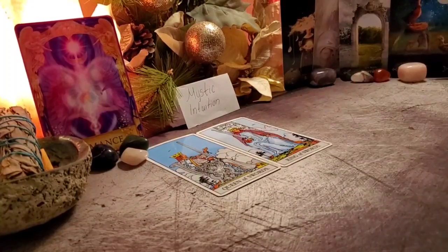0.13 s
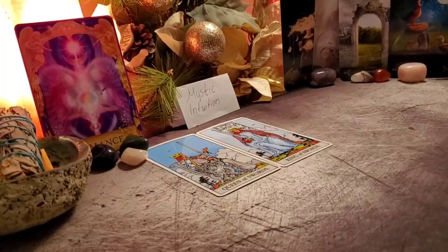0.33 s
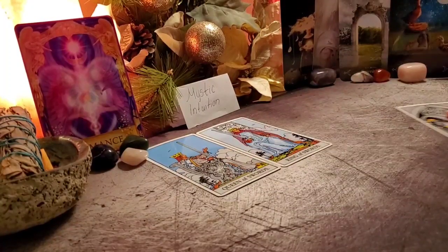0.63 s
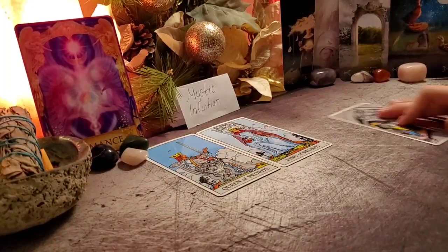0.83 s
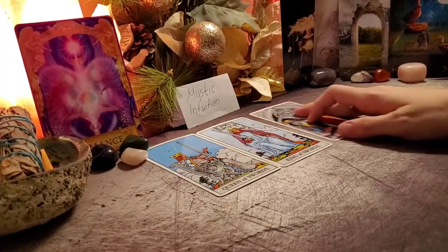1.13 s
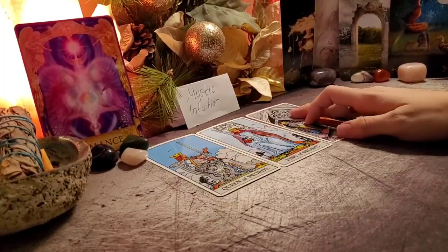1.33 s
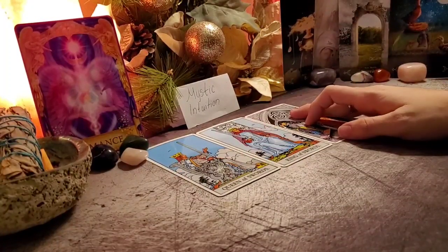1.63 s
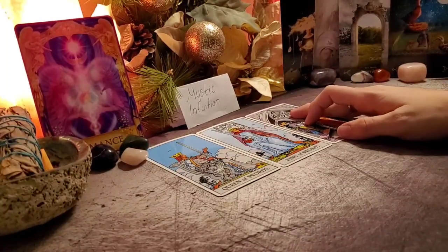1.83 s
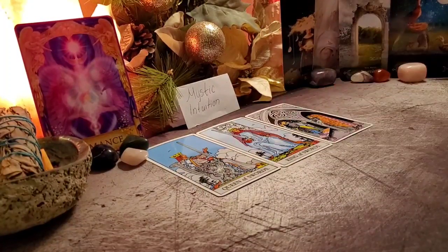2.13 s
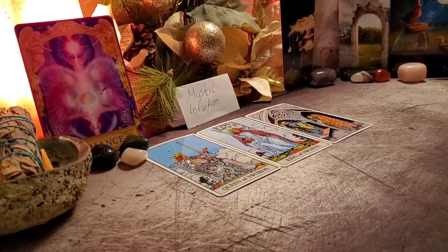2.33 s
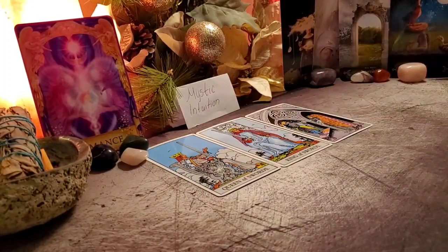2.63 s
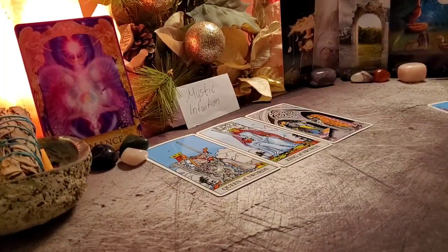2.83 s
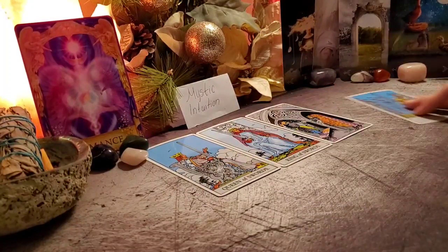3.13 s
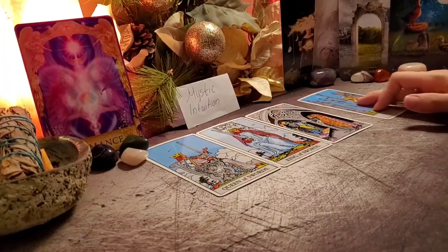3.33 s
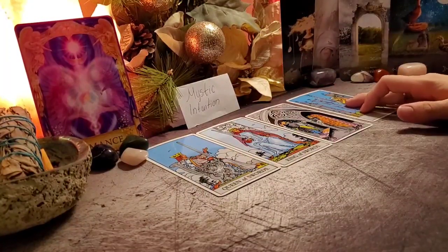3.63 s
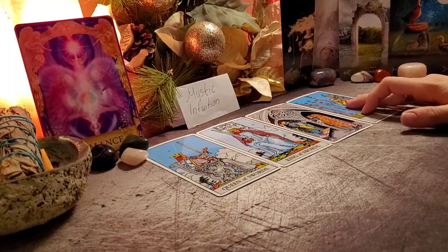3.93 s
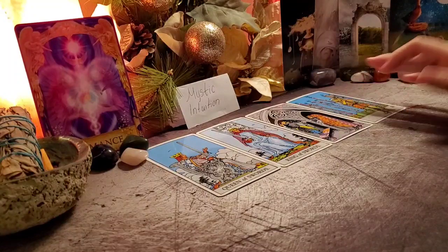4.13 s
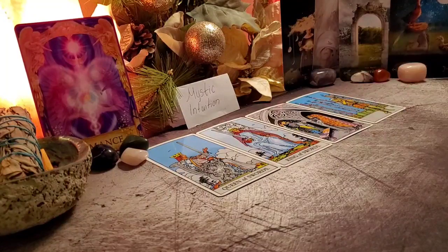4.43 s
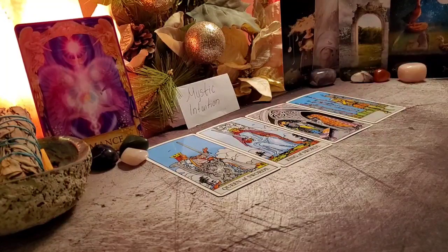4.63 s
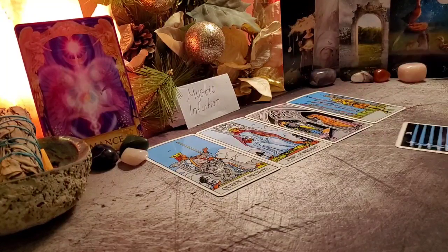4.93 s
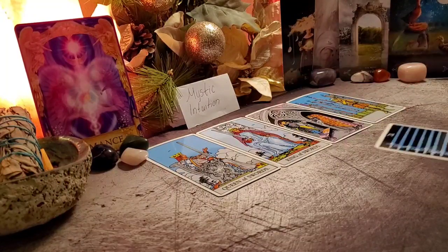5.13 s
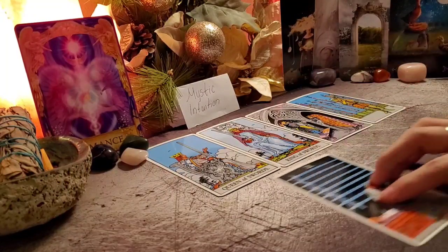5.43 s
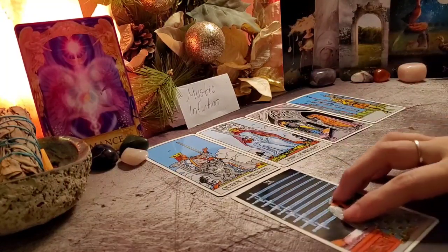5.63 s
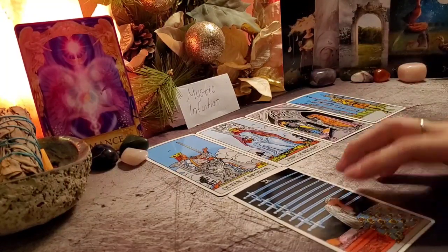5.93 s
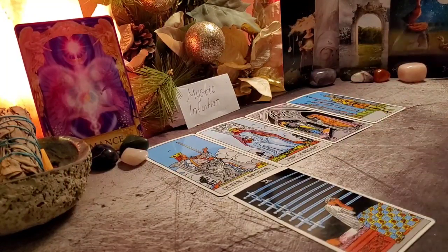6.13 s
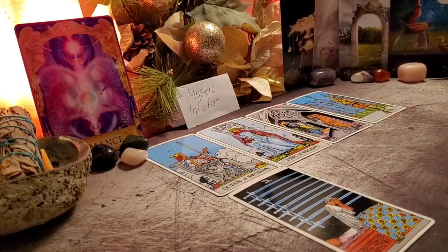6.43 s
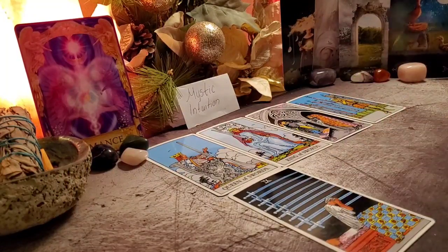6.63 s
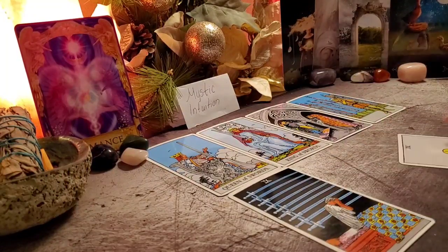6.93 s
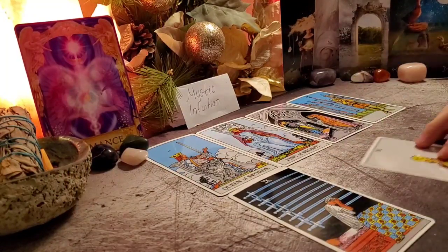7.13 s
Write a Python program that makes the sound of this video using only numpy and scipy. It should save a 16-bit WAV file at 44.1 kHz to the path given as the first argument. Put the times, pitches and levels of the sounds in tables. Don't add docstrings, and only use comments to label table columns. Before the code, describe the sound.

Close stereo pickup in a small room with a steady low motor hum and soft appliance wash. Four times, about two seconds apart, a stiff card drags off a deck at the right and snaps free in a quick, crisp flurry of clicks. A moment later it ticks and knocks onto the hard table in front, then slides with a faint grainy hiss. The hum fills the gaps.

```python
import sys
import numpy as np
from scipy import signal
from scipy.io import wavfile
from scipy.ndimage import uniform_filter1d

SR = 44100
rng = np.random.default_rng(int(sys.argv[2]) if len(sys.argv) > 2 else 0)


def dump_mix(stems):
    frames = np.atleast_2d(stems).T
    limited = np.clip(frames, -1, 1)
    pcm = np.round(limited * 32767).astype(np.int16)
    wavfile.write(sys.argv[1], SR, pcm)


def to_linear_factor(level_db):
    exponent = np.asarray(level_db, float) / 20
    return 10 ** exponent


N = 321489

STEADY, SUDDEN = 2.5, 1.2


def evened(x):
    return x / np.sqrt(np.mean(x ** 2) + 1e-20)


def peaked(x):
    return x / (abs(x).max() + 1e-20)


def read(points, hz):
    f, value = np.transpose(points)
    return np.interp(np.log(hz + 1), np.log(f + 1), value)


def ring(x, hz, t60):
    r = 10 ** (-3 / (t60 * SR))
    return signal.lfilter([1, 0, -1], [1, -2 * r * np.cos(2 * np.pi * hz / SR), r * r], x)


def twice(x, hz, t60):
    return peaked(ring(ring(x, hz, t60), hz, t60 / 2))


def port_noise(shape_db, same, lag_s, pan_db, size, patchy_db):
    hop = size // 4
    hz = np.fft.rfftfreq(size, 1 / SR)
    a, b, c, d, patches = rng.standard_normal((N // hop + 5, len(hz), 5)).T
    for axis in (0, 1):
        patches = uniform_filter1d(patches, size=10, axis=axis)
    alike = np.clip(same(hz), 0, 1)[:, None]
    right = a + 1j * b
    delay = np.exp(-2j * np.pi * hz * lag_s)[:, None]
    left = alike * right * delay + np.sqrt(1 - alike ** 2) * (c + 1j * d)
    pan = to_linear_factor(pan_db(hz) / 2)[:, None]
    spectra = np.array([left * pan, right / pan])
    spectra *= to_linear_factor(shape_db(hz)[:, None] + patchy_db * evened(patches))
    return evened(signal.istft(spectra, nperseg=size, noverlap=size - hop)[1][:, :N])


def strokes(rows, power, extra_db=0):
    t = np.arange(0, N / SR + .01, .001)
    peak, rise, fall, db = np.array(rows).T[:4, :, None]
    away = np.maximum((peak - t) / rise, (t - peak) / fall)
    each = to_linear_factor(db + extra_db - 30 * abs(away) ** power)
    return np.interp(np.arange(N) / SR, t, np.sqrt((each ** 2).sum(0)))


def background(wash_db=-7, second_db=-26):
    # t/s, level/dB
    hum_level = [(0.0, -43), (0.1, -42), (0.3, -43.5), (0.6, -45.5), (1.44, -45.5), (1.87, -42), (2.5, -43),
                 (2.7, -42.5), (4.16, -43), (4.3, -42.3), (4.63, -43.5), (7.07, -42.5), (7.29, -43)]
    # f/Hz, density/dB per Hz
    wash_shape = [(15, -68), (25, -38.5), (54, -27.5), (86, -27), (101, -12.5), (125, -14.5), (150, -16),
                  (202, -18.5), (237, -34.5), (264, -22.5), (543, -25), (604, -17.5), (769, -26),
                  (833, -26), (15000, -78.5)]
    # f/Hz, width/Hz, level/dB
    ducts = [(59.07, 12, 0.5), (208.7, 16, -4), (284, 13, -3.5), (360, 81, -10), (430, 90, -9.5),
             (593, 43, -8.5), (1200, 30, -20.5)]
    # f/Hz, likeness [0-1]
    likeness = [(60, 0.84), (290, .93), (700, 0.98), (1500, 0.67), (4000, 0.1), (15000, .1)]
    # f/Hz, left minus right/dB
    wash_pan = [(60, -0.5), (180, 2.5), (550, -2), (1650, 9), (4970, 4.5), (15000, -13.5)]
    t = np.arange(N) / SR

    def colour(hz):
        humps = sum(to_linear_factor(2 * db) / (1 + (2 * (hz - f) / w) ** 2) ** 2 for f, w, db in ducts)
        return 10 * np.log10(to_linear_factor(2 * read(wash_shape, hz) - 4.0) + humps * to_linear_factor(-14.0))

    wash = port_noise(colour, lambda hz: read(likeness, hz), -0.00034, lambda hz: read(wash_pan, hz),
                      size=4096, patchy_db=1.8)
    wash += to_linear_factor(-42.0) * evened(np.diff(rng.standard_normal((2, N + 1))))
    turn = 2 * np.pi * 119.8 * t
    hum = np.sqrt(2) * (np.sin(turn + [[.15], [0]]) + to_linear_factor(second_db) * np.sin(2 * turn))
    hum *= to_linear_factor([[1.2], [-1.3]])
    return to_linear_factor(np.interp(t, *np.transpose(hum_level))) * (hum + to_linear_factor(wash_db) * wash)


def room(x):
    # f/Hz, t60/s
    decay = [(150, 0.33), (500, 0.33), (1500, 0.3), (4000, 0.2), (8000, 0.21), (14000, 0.16)]
    taps = np.zeros((2, SR // 2))
    at = np.arange(120, SR // 2 - 20, 20) + rng.integers(0, 20, (2, (SR // 2 - 121) // 20))
    np.put_along_axis(taps, at, rng.choice([-1., 1.], at.shape), 1)
    taps[0] = 0.12 * np.roll(taps[1], 12) + 1.6 * taps[0]
    hz, t, spectra = signal.stft(taps, SR, nperseg=256)
    fading = spectra * to_linear_factor(-60 * t / read(decay, hz)[:, None])
    tail = signal.istft(fading, SR, nperseg=256)[1]
    return signal.fftconvolve(x.mean(0)[None], tail / np.linalg.norm(tail[0]), axes=1)[:, :N]


def slides():
    # peak t/s, rise/s, fall/s, hiss level/dB, scrape against hiss/dB
    table_slides = [(0.84, 0.19, 0.36, -69.5, -21), (1.06, 0.38, 0.28, -68, 0.5),
                    (1.49, 0.12, 0.059, -86, -1), (2.18, 0.32, 0.2, -77, 2), (2.39, 0.069, 0.14, -80.5, -7),
                    (3.02, 0.063, 0.4, -66.5, -9), (3.27, 0.22, 0.41, -64, 2), (3.84, 0.075, .17, -84, 4),
                    (4.27, 0.18, 0.2, -78, 5), (5.17, 0.3, .25, -73, 0), (5.5, 0.57, 0.38, -69, -4.5),
                    (6.23, 0.27, 0.13, -78, 1), (6.95, 0.095, 0.13, -77, 6.5), (7.13, .2, .07, -74, -3),
                    (7.3, 0.22, .1, -72.5, -4)]
    deck_pulls = [(0.054, 0.1, 0.053, -63, -4), (0.178, 0.13, 0.037, -65, -2), (0.29, 0.2, .02, -64, 1),
                  (0.31, 0.023, 0.16, -40, -0.5), (0.54, 0.01, 0.16, -70, 12.5),
                  (2.575, 0.1, 0.2, -57.5, -4), (2.632, 0.039, 0.15, -54.5, -2),
                  (2.868, 0.0073, 0.23, -76, 13.5), (4.69, 0.38, .05, -69, 3),
                  (4.718, 0.02, 0.035, -58.5, 3.5), (4.74, 0.013, 0.15, -44.5, -11),
                  (5.002, 0.0054, .15, -83.5, 17.5), (6.375, .006, .12, -73.5, 11),
                  (6.422, .015, 0.033, -67, 0), (6.605, 0.17, 0.13, -47, -5.5),
                  (6.85, .005, 0.15, -68.5, 17)]
    # f/Hz, density/dB per Hz
    hiss_shape = [(1760, -44), (3000, -1), (4840, -4.5), (6340, -1), (7810, -9.5), (8460, -6.5),
                  (13900, -5.5), (15000, -9.5)]
    # f/Hz, density/dB per Hz
    scrape_shape = [(500, -44.5), (1100, 1), (2000, 3), (3300, -14), (5000, -19.5), (6000, -62)]
    hiss = port_noise(lambda hz: read(hiss_shape, hz), lambda hz: 0.15 + 0 * hz, 0.00022,
                      np.zeros_like, size=256, patchy_db=1.5)
    scrape = port_noise(lambda hz: read(scrape_shape, hz), lambda hz: 0.4 + 0 * hz, 0.00027,
                        np.zeros_like, size=512, patchy_db=2.5)
    side = np.array([[.5], [-.5]])
    fine, coarse = to_linear_factor(-99 + side * 4.5), to_linear_factor(-72.5 + side * 4.5)
    for rows, power, pan_db in ((table_slides, STEADY, 1), (deck_pulls, SUDDEN, -4)):
        pan = to_linear_factor(side * pan_db)
        scrape_db = np.array(rows)[:, -1:]
        fine = np.hypot(fine, strokes(rows, power) * pan)
        coarse = np.hypot(coarse, strokes(rows, power, scrape_db) * pan)
    return to_linear_factor(6.0) * (fine * hiss + coarse * scrape)


def push():
    pushes = [
        (2.59, 0.14, .05, -62.5),
        (2.625, 0.032, .008, -47.5),
        (4.575, 0.05, 0.23, -61.5),
    ]
    rub = evened(ring(rng.standard_normal((2, N)), 3400, 0.0031))
    return rub * strokes(pushes, STEADY) * to_linear_factor([[-3.5], [3.5]])


def wipe():
    wipes = [
        (2.522, 0.025, 0.16, -53),
        (4.715, 0.04, 0.075, -54),
        (6.51, 0.047, .1, -48),
        (6.575, 0.084, .07, -41),
    ]
    treble = signal.butter(3, 7500, "high", fs=SR)
    fizz = evened(signal.lfilter(*treble, rng.standard_normal((2, N))))
    return fizz * strokes(wipes, STEADY) * to_linear_factor([[-3.2], [3.2]])


def slips(rows, edge_db, weight_db, octave_db=11.5):
    return [(s, db + edge_db + octave_db * np.log2(hz / 2700), hz, db, knock_db,
             -29.5 + weight_db + 0.6 * (knock_db + 20.5)) for s, db, hz, knock_db in rows]


def clicks(rows, knocks, lag_s, ports_db, low_hz, top_hz, drag_db, card_t60, shadow_db):
    knock_t60, thump_t60, rattle_t60, drag_t60 = .0065, .015, .005, 0.04
    out, t = np.zeros((2, N + 4000)), np.arange(3000) / SR
    chance = rng.standard_normal((len(rows), 3, len(t)))
    bright = signal.butter(2, [low_hz, min(top_hz, 20000)], "band", fs=SR)
    rattle, drag = to_linear_factor(-60 * t / rattle_t60), to_linear_factor(drag_db - 60 * t / drag_t60)
    for (s, tick_db, ring_hz, ring_db, knock_db, thump_db), (shared, *own) in zip(rows, chance):
        tune = 1 + 0.16 * np.tanh(shared[-2:])
        knock_hz = np.interp(s, *np.transpose(knocks))
        for port in (0, 1):
            blow = (shared + 0.82 * own[port]) * rattle - 2.7 * (t == 0)
            tick = peaked(signal.lfilter(*bright, blow + own[port] * (1.2 * rattle + 5.5 * drag)))
            blow = blow + shared[::-1] * drag
            card = twice(blow, ring_hz, card_t60)
            knock = twice(blow, knock_hz * tune[0], knock_t60)
            knock += 0.43 * twice(blow, knock_hz * 0.7, knock_t60)
            knock -= 0.2 * twice(blow, knock_hz * 1.8, knock_t60)
            shove = shared * rattle - 2.4 * (t == 0)
            thump = twice(shove, 240 * tune[1], thump_t60) + .07 * twice(shove, 60, 0.07)
            sound = to_linear_factor(tick_db + 3.0 - shadow_db * (6 - port)) * tick
            sound += to_linear_factor(ring_db + 0.67) * card
            sound += to_linear_factor(knock_db + 2.5) * peaked(knock)
            sound += to_linear_factor(thump_db + 1.5) * thump
            at = round((s + lag_s * (1 - port)) * SR)
            out[port, at:at + len(t)] += sound * to_linear_factor(ports_db[port])
    return out[:, :N]


def landings():
    # t/s, snap level/dB, card ring f/Hz, table knock level/dB
    touches = [(0.5365, -44, 3600, -41), (0.5403, -39, 4450, -33.5), (0.5554, -29, 3760, -31),
               (0.5641, -30.5, 3140, -59), (0.5735, -33, 3120, -67.5), (2.8636, -34, 3270, -34.5),
               (2.8713, -36, 3050, -51), (2.882, -37.5, 3000, -65), (2.9824, -57, 4400, -62),
               (2.9916, -50.5, 4623, -59), (4.215, -56, 4120, -59.5), (4.9848, -52.5, 3600, -51),
               (4.9999, -37.5, 4180, -38), (5.0089, -41.5, 3040, -50), (5.0185, -40.5, 3280, -63),
               (6.8472, -33, 4200, -17.5), (6.8574, -43, 2350, -32), (6.8958, -45, 2370, -38),
               (6.9087, -44, 3820, -47.5), (6.962, -57, 4500, -61.5), (7.0817, -49.5, 2200, -63)]
    # t/s, f/Hz
    table_knock = [
        (.54, 727),
        (2.87, 1250),
        (5.01, 845),
        (6.848, 682),
    ]
    return clicks(slips(touches, -5.5, -1.54, octave_db=17), table_knock, .0001, (-.1, -1.5), low_hz=2200,
                  top_hz=6500, drag_db=-13.5, card_t60=0.0041, shadow_db=1.2)


def deals():
    # t/s, snap level/dB, card ring f/Hz, deck knock level/dB
    fumbles = [(0.0303, -38.5, 2290, -62.5), (0.0345, -36, 2900, -57), (0.0385, -46, 3070, -60),
               (0.0423, -40, 2900, -55), (0.0551, -57, 2640, -68.5), (0.132, -38.5, 3540, -47.5),
               (0.1692, -52, 4680, -60.5), (0.1818, -43.5, 3210, -67), (0.2257, -39.5, 3200, -66.5),
               (0.234, -48.5, 2250, -65), (2.5173, -55.5, 6020, -59.5), (6.3721, -47.5, 2480, -43.5),
               (6.389, -65, 5000, -66), (6.4229, -42, 2900, -66), (6.4986, -63, 6500, -64),
               (6.5964, -30, 3050, -42)]
    deal_1 = [(0.3061, -27.5, 1820, -29), (0.3125, -23, 2510, -31), (0.3148, -16.5, 2200, -28.5),
              (0.322, -21.5, 1980, -30), (0.3275, -8, 2590, -9.5), (0.3308, -12, 2440, -10),
              (0.3365, -14.5, 2900, -17), (0.3391, -21.5, 2070, -17), (0.3494, -19, 2800, -16.5),
              (0.355, -21.5, 2400, -24.5), (0.3593, -15.5, 2665, -20), (0.3677, -15, 2400, -17),
              (0.3765, -28.5, 3220, -22.5), (0.385, -35.5, 3000, -24)]
    deal_2 = [
        (2.6338, -5, 3630, -16),
        (2.6374, -22.5, 2080, -20),
        (2.6403, -18, 2100, -17),
        (2.645, -15, 4100, -18),
        (2.649, -22.5, 2200, -26),
        (2.654, -37.5, 4270, -21.5),
        (2.6598, -33.5, 3170, -23),
        (2.673, -35, 3090, -32),
    ]
    deal_3 = [(4.7346, -16, 2220, -10.5), (4.7371, -13.5, 3100, -6), (4.7404, -14.5, 3540, -22),
              (4.7446, -12, 2300, -14), (4.749, -8.5, 2040, -23), (4.7537, -12.5, 3120, -15),
              (4.7582, -14, 2870, -14), (4.7603, -25, 2530, -23), (4.7654, -10.5, 2710, -20),
              (4.7727, -26, 2360, -39.5), (4.7796, -25, 2840, -22.5), (4.7867, -30.5, 4160, -24.5),
              (4.7939, -29.5, 2820, -26.5)]
    deal_4 = [(6.6136, -13.5, 3300, -14), (6.6183, -19.5, 2620, -11), (6.6246, -10, 2520, -9),
              (6.627, -25, 2960, -21), (6.6321, -16.5, 2220, -16), (6.6374, -19, 2340, -17),
              (6.6433, -37, 2640, -26), (6.6587, -24, 4100, -16.5), (6.6675, -32.5, 2740, -28),
              (6.6716, -44, 2260, -21.5), (6.6774, -48, 1920, -21.5)]
    grip_db = [
        -4,
        0,
        -9,
        0,
        -7.5,
    ]
    hand_db = [
        1,
        -1,
        1.5,
        3.5,
        0,
    ]
    # t/s, f/Hz
    deck_knock = [
        (0.329, 1220),
        (.37, 1266),
        (2.639, 934),
        (4.735, 1038),
        (4.762, 1180),
        (6.629, 1200),
        (6.67, 676),
    ]
    snaps = sum(map(slips, (fumbles, deal_1, deal_2, deal_3, deal_4), grip_db, hand_db), [])
    return clicks(snaps, deck_knock, 0.00037, (-4.5, -.1), low_hz=3600, top_hz=14700, drag_db=-12.0,
                  card_t60=.0036, shadow_db=0.5)


def scene():
    hits = landings() + deals()
    return background() + to_linear_factor(-11.5) * room(hits) + slides() + push() + wipe() + hits


def roll_off(x):
    return signal.sosfilt(signal.butter(12, 16510, fs=SR, output="sos"), x)


def record(dry):
    edge, leak = (signal.firwin(511, hz, window=("kaiser", 8), fs=SR) for hz in (14550, 16400))
    loudness = np.minimum(uniform_filter1d(abs(dry), size=200, axis=1) / .07, 1)
    limited = signal.oaconvolve(dry, edge[None], "same")
    limited += to_linear_factor(-27) * signal.oaconvolve(dry * loudness, leak[None], "same")
    return roll_off(limited)


dry = scene()
out = record(dry)
dump_mix(out)
```